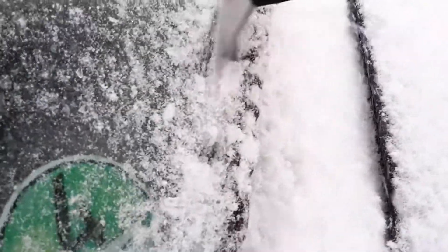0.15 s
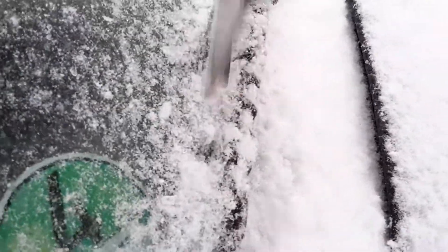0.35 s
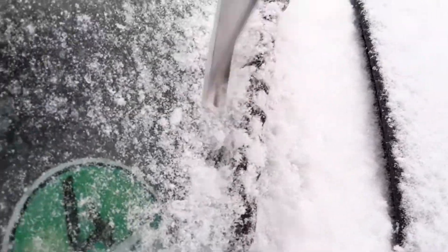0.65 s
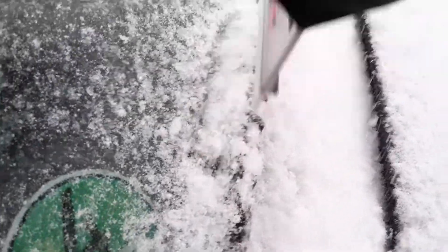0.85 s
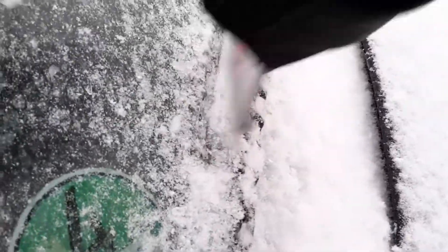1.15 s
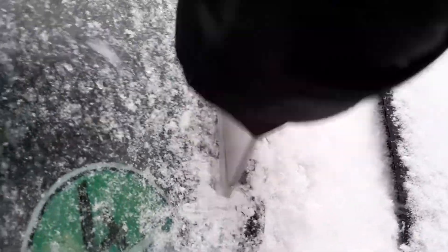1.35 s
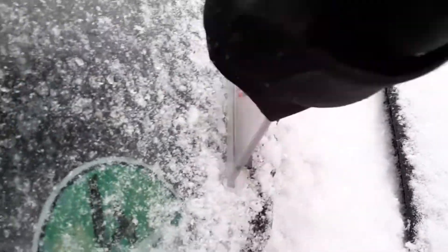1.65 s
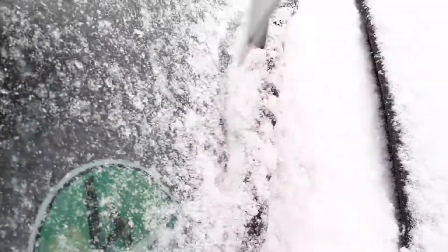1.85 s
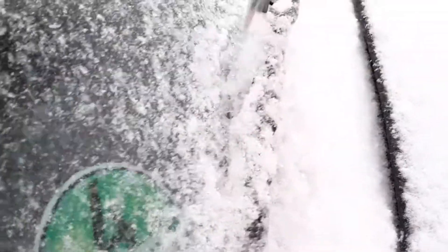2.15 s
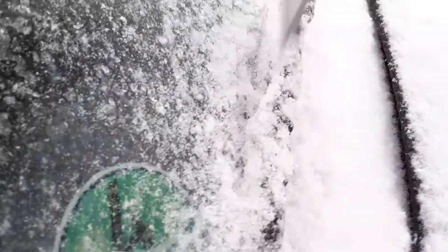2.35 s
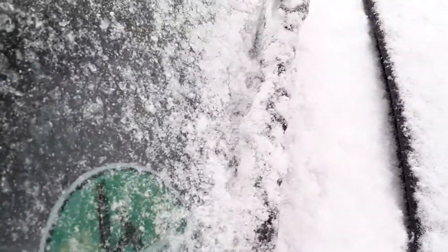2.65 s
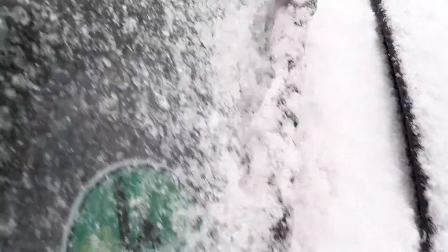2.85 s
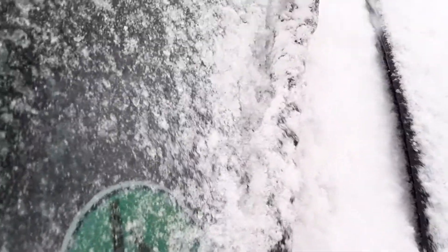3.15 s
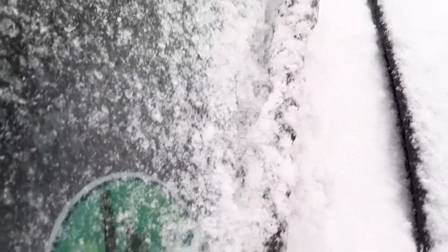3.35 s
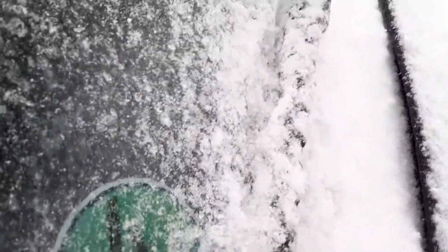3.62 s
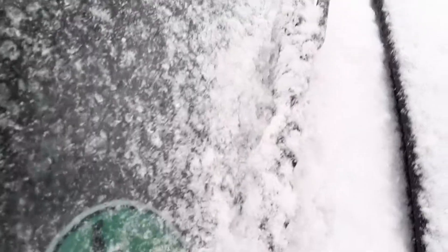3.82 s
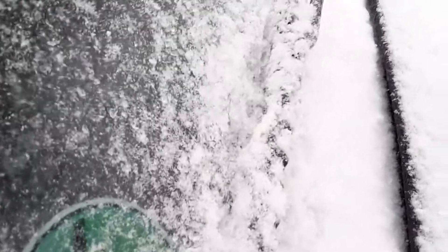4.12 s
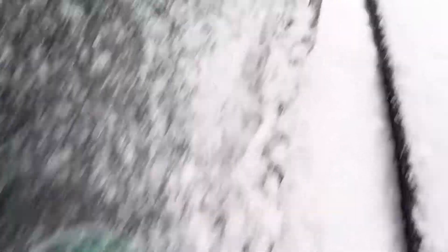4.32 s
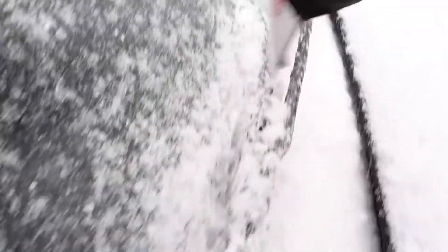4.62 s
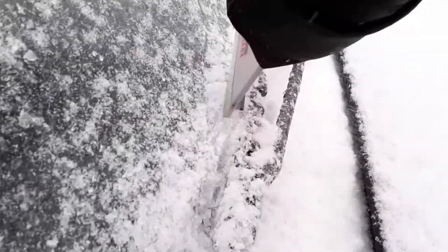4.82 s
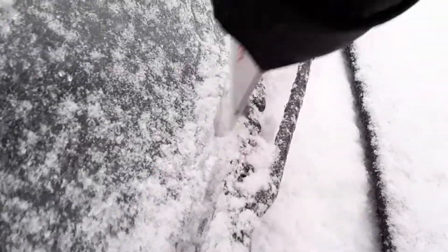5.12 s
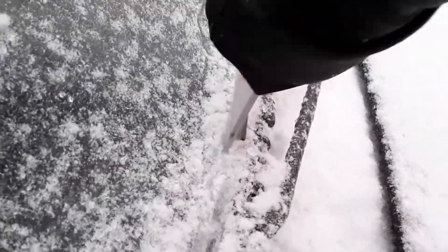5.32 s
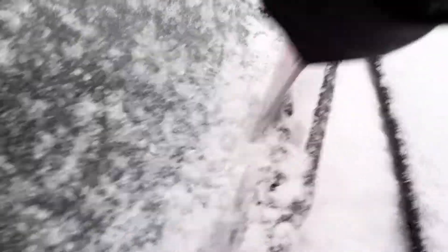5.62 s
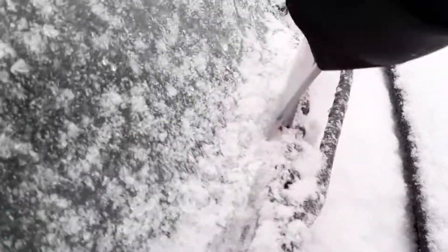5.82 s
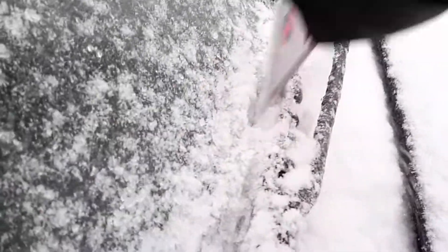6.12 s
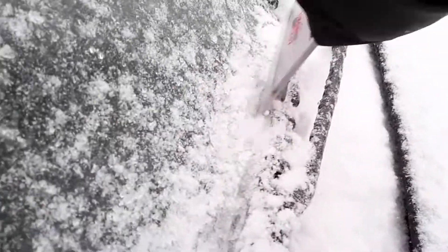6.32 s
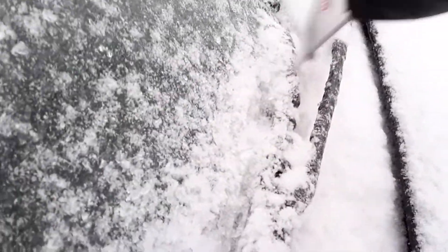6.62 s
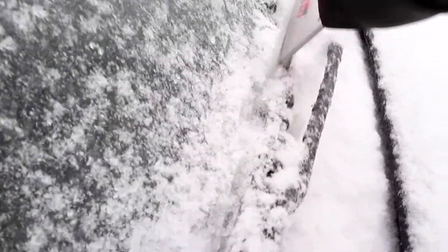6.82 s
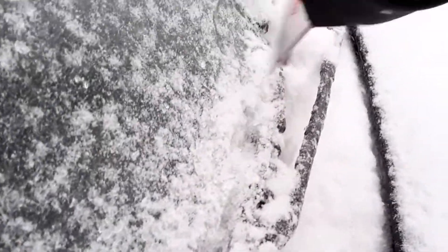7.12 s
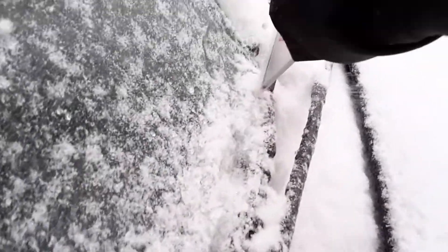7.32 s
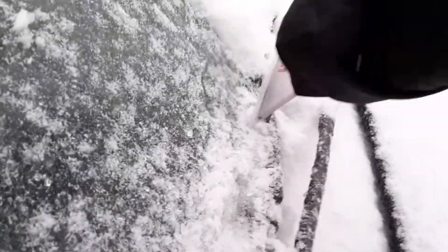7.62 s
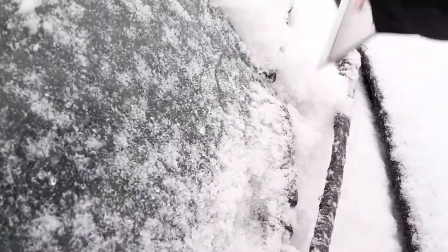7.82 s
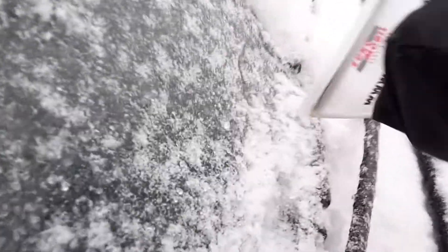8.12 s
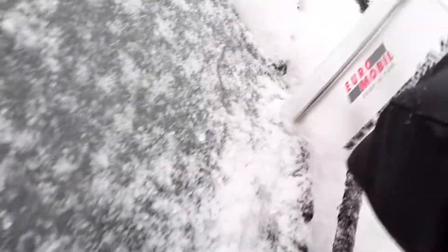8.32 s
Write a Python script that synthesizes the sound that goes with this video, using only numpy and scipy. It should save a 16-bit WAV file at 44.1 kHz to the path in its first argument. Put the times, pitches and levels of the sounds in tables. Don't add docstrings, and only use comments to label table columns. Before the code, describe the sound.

Close outdoor stereo pickup of a plastic scraper working on a snowy car windscreen. Strokes land roughly every 0.3 seconds, each a dull hollow glass boom with a brittle crackle and plastic clack, then a light fizz as the blade pulls back. Blows are hardest around the middle, where a distant car faintly swells. It ends with a weak tap and soft slide through loose snow.

```python
import sys
import numpy as np
from scipy import signal
from scipy.fft import rfft, irfft
from scipy.io import wavfile
from scipy.ndimage import uniform_filter1d

SR = 44100
rng = np.random.default_rng(int(sys.argv[2]) if len(sys.argv) > 2 else 0)


def gain_from_decibels(decibels):
    exponent = np.asarray(decibels, float) / 20
    return 10 ** exponent


def output_pcm(signal):
    pcm = np.clip(np.atleast_2d(signal).T, -1, 1) * 32767
    wavfile.write(sys.argv[1], SR, np.round(pcm).astype(np.int16))


N = 373527


def evened(x):
    return x / np.sqrt(np.mean(x ** 2) + 1e-20)


def add(mix, at, sound):
    part = mix[at:][:len(sound)]
    part += sound[:len(part)]


def curve(rows, column):
    return np.interp(np.arange(N) / SR, [row[0] for row in rows], [row[column] for row in rows])


def colour(x, points):
    hz, db = np.transpose(points)
    log_hz = np.log(np.fft.rfftfreq(4096, 1 / SR) + 1)
    log_gain = np.interp(log_hz, np.log(hz), db, -90, -90) * np.log(10) / 20
    circle = np.concatenate([log_gain, log_gain[-2:0:-1]])
    phase = signal.hilbert(circle).imag
    taps = np.fft.ifft(np.exp(circle - 1j * phase)).real[:2048]
    return signal.oaconvolve(x, taps[None] / np.linalg.norm(taps), axes=1)[:, :N]


def ring(modes, lift_db=0, size=SR // 3):
    hz, db, t60, rise = np.transpose(modes)[:, :, None]
    t = np.arange(size) / SR
    fade = gain_from_decibels(db + lift_db - 60 * t / t60)
    swell = 1 - np.exp(-t / rise)
    return (fade * swell * np.sin(2 * np.pi * hz * t)).sum(0)


def pair(same):
    a, b = rng.standard_normal((2, N))
    same = np.clip(same, 0, 1)
    return np.array([a, same * a + np.sqrt(1 - same ** 2) * b])


def scatter(x, level_db, t60, top_hz):
    t = np.arange(SR // 3) / SR
    tail = rng.standard_normal((2, len(t))) + rng.standard_normal(len(t))
    tail = signal.lfilter(*signal.butter(2, top_hz, fs=SR), tail) * gain_from_decibels(-t / t60 * 60)
    return x + gain_from_decibels(level_db) * signal.oaconvolve(x, tail / np.linalg.norm(tail[0]), axes=1)[:, :N]


# t/s, rumble level/dB, tyre hiss level/dB
ROAD = [
    (0.0, -64, -87),
    (2.44, -66.5, -88.5),
    (4.28, -51.5, -70),
    (6.21, -64, -86),
    (7.35, -61.5, -88),
    (8.0, -66.5, -91),
]
# f/Hz, level/dB
RUMBLE = [(20, -25.5), (40, -4.5), (90, 1.5), (220, -4), (400, -15.5), (600, -21), (900, -35), (1600, -58)]
# f/Hz, level/dB
TYRES = [(700, -3.5), (1100, -3), (1700, -4.5), (2400, -1), (3300, -15.5), (5000, -21), (8800, -38),
         (10100, -7.5), (11200, -10), (13500, -8.5), (14500, -4.5), (14800, -45)]


def road():
    lumps = gain_from_decibels(2.0 * evened(uniform_filter1d(rng.standard_normal(N), 2500)))
    rumble = colour(pair(0.77), RUMBLE) * lumps * gain_from_decibels(curve(ROAD, 1) + 4.5)
    hiss = colour(pair(0.078), TYRES) * gain_from_decibels(curve(ROAD, 2) + 2.5)
    return rumble + hiss


# t/s, level/dB
LAST_SLIDE = [
    (8.03, -99),
    (8.2, -82),
    (8.3, -76),
    (8.47, -66),
]
# middle t/s, length t/s, fizz level/dB, level/dB of snow trickling after the stroke
RETURNS = [(0.279, 0.059, -62.5, -63.5), (0.602, 0.041, -60.5, -63.5), (0.919, 0.034, -52, -64),
           (1.242, 0.15, -66, -60), (1.542, 0.048, -59, -65), (1.849, 0.048, -65, -73),
           (2.144, 0.06, -57, -66.5), (2.419, 0.053, -52, -63), (2.699, 0.13, -57.5, -66),
           (2.974, 0.049, -54, -60.5), (3.256, 0.037, -51, -65.5), (3.527, 0.052, -78, -63),
           (3.853, 0.3, -75, -61.5), (4.143, 0.045, -50, -58), (4.427, 0.019, -50, -54.5),
           (4.696, 0.04, -52, -59), (4.989, 0.052, -49, -60.5), (5.241, 0.029, -47.5, -61.5),
           (5.512, 0.036, -74, -62), (5.76, 0.03, -66, -63.5), (6.01, 0.025, -58.5, -78),
           (6.246, 0.071, -53.5, -69), (6.487, 0.2, -68, -60), (6.733, 0.11, -76, -84.5),
           (6.972, 0.036, -72.5, -74), (7.228, 0.072, -83, -70), (7.504, 0.016, -63, -71),
           (7.794, 0.039, -60.5, -73)]


def drag():
    t = np.arange(N) / SR
    fizz = gain_from_decibels(curve(LAST_SLIDE, 1)) * (t > LAST_SLIDE[0][0])
    rasp = np.zeros(N)
    part = t[:round(0.45 * SR)]
    for middle, length, fizz_db, trickle_db in RETURNS:
        at = round((middle - 0.1) * SR)
        pull = gain_from_decibels(fizz_db - 68 * ((part - 0.1) / length) ** 2)
        add(fizz, at, gain_from_decibels(trickle_db + 3.0 - 90 * part))
        add(fizz, at, pull)
        add(rasp, at, pull * gain_from_decibels(-26.5 - (1 - 0.69) * fizz_db))
    for blow in BLOWS:
        at = round(blow[0] * SR) - 900
        fading = fizz[at:][:900].copy()
        add(fizz, at, -0.8 * fading * np.minimum(np.arange(900) / 300, 1))
    hits = rng.random(N) < 3000 / SR
    size = gain_from_decibels(3.5 * np.minimum(rng.exponential(1, N), 4)) * hits
    flutter = gain_from_decibels(1.4 * evened(uniform_filter1d(rng.standard_normal(N), 200)))
    grains = evened(size * pair(0.3) + 0.5 * pair(0.091)) * flutter * gain_from_decibels([[1.2], [-1.2]])
    dull = signal.butter(2, 2970, fs=SR)
    rasping = signal.lfilter(*dull, colour(grains * rasp, CLACK))
    return gain_from_decibels(-4.0) * colour(grains * fizz, PORT) + gain_from_decibels(-3.0) * rasping


def stroke(s):
    return np.argmin([abs(blow[0] - s) for blow in BLOWS])


# crackle level/dB below the whistle, treble lag of the left port [samples],
# treble left-right level/dB, low mode level/dB, middle mode level/dB
SPOTS = [(4.5, -20.5, 6.5, -0.5, 9), (6, -4, 3.5, 8, -5.5), (5, -19.5, 3, 3, -5.5), (4, -2, 5, 1, -3),
         (2, -3, 3.5, 8.5, -1), (7, -3.5, 5, 5.5, 7.5), (1.5, -17.5, 2, -4, 0.5),
         (-1.5, -8, -1, -0.5, 14.5), (3, 16.375, 6.5, 0, -2.5), (8, -1, 0, 5, 4), (2, -17.5, 3, 1, -8),
         (8.5, -4, 2.5, 6, 3), (4.5, -11.5, 4, -7.5, -11), (3, 5.5, 4, -4, 2.5), (8.5, -19, 6.5, 8, 4.5),
         (10.5, 3.5, 4, 4, 10), (0, -8.5, 1.5, 2.5, -8), (-5.5, -4, 2, 4.5, -1.5), (5, 6, 4.5, 8, -0.5),
         (-1.5, -9, 3, 7.5, -2), (-5, 0.5, -3, 4.5, 0.5), (2, -4.5, 7, 0.5, 4), (0, 0, 2, 7.5, -8),
         (-12, -5.5, 3, 6.5, -15), (4.5, -14, 3.5, -1, -2), (-0.5, 4.5, 2.5, 9, 9.5),
         (-5, -0.5, 3.5, 0.5, 1.5), (-9, -12, 3.5, 1, 0.5), (-14, 28.75, 10, 2, 0)]


def spot(s):
    return SPOTS[stroke(s)]


# t/s, length t/s, crackle level/dB, blade clack relative level/dB
BITES = [(0.152, 0.011, -29.5, -18), (0.485, 0.023, -34.5, -21), (0.795, 0.011, -39, -8),
         (1.127, 0.013, -34, -16.5), (1.4395, 0.013, -37, -11.5), (1.7366, 0.0024, -34.5, -8),
         (2.038, 0.0035, -26, -16.5), (2.319, 0.0071, -30.5, -17.5), (2.6035, 0.011, -22, -22.5),
         (2.8737, 0.005, -26.5, -9.5), (3.1493, 0.0039, -27.5, -5.5), (3.435, 0.0031, -30.5, 4.5),
         (3.715, 0.011, -23, -8), (4.017, 0.0016, -17.5, -3), (4.3205, 0.0054, -24.5, -7.5),
         (4.584, 0.0032, -21, -10), (4.87, 0.0051, -21.5, -16.5), (5.1269, 0.0018, -23, -5.5),
         (5.4107, 0.0034, -40.5, 3), (5.644, 0.014, -31.5, -15), (5.8942, 0.0013, -24.5, -6.5),
         (6.132, 0.0057, -33, -17), (6.3921, 0.0027, -27, -11.5), (6.649, 0.0012, -27, -6),
         (6.894, 0.0036, -32, -8), (7.1435, 0.0014, -27.5, -5.5), (7.402, 0.0054, -33.5, -10),
         (7.6944, 0.0024, -31, -6.5), (8.216, 0.0063, -59.5, -2.5)]
# t/s, length t/s, crackle level/dB
CRACKS = [(0.155, 0.0013, -28), (0.16, 0.0018, -26.5), (0.1627, 0.001, -33), (0.4846, 0.0031, -33.5),
          (0.4968, 0.0014, -25.5), (0.4988, 0.002, -38), (0.7975, 0.0023, -30), (0.804, 0.0027, -27),
          (1.1261, 0.0023, -29), (1.1315, 0.0046, -24.5), (1.4464, 0.0022, -29), (1.7376, 0.0048, -37.5),
          (1.744, 0.0043, -37), (2.037, 0.0034, -28), (2.045, 0.0022, -30.5), (2.3214, 0.0032, -19),
          (2.328, 0.004, -21), (2.614, 0.0028, -31), (2.6184, 0.0024, -27), (2.873, 0.0022, -34),
          (2.8746, 0.0037, -34), (2.885, 0.0027, -40), (2.889, 0.0033, -47), (3.1488, 0.002, -24),
          (3.152, 0.0018, -28), (3.4366, 0.0017, -29), (3.4407, 0.0038, -35.8), (3.718, 0.0017, -18),
          (3.7266, 0.0034, -30.0), (4.017, 0.0029, -29), (4.0224, 0.0022, -17), (4.318, 0.0075, -28.2),
          (4.5827, 0.0035, -27), (4.5895, 0.0024, -23.5), (4.5918, 0.0015, -24), (4.851, 0.0028, -22),
          (5.126, 0.0015, -26.5), (5.4084, 0.0014, -42), (5.4108, 0.0012, -30.5), (5.6468, 0.0027, -29.5),
          (5.6537, 0.0013, -27.5), (5.6566, 0.002, -25.5), (5.6578, 0.0018, -29), (5.661, 0.0012, -25),
          (5.8916, 0.0032, -29.5), (5.8995, 0.00089, -27), (6.1343, 0.0022, -31), (6.1405, 0.0021, -30.4),
          (6.3914, 0.0013, -25.5), (6.3985, 0.002, -26.5), (6.6484, 0.0014, -31.5), (6.654, 0.0012, -26),
          (6.8916, 0.0026, -36), (6.899, 0.0035, -33.5), (7.1423, 0.0029, -29), (7.4035, 0.0018, -27),
          (7.4057, 0.0023, -35.5), (7.6946, 0.0034, -30), (8.217, 0.00083, -50.5), (8.221, 0.0015, -60)]
# t/s, crackle level/dB, relative level/dB of the knock in the glass, relative level/dB of the blade clack
SNAPS = [(0.1591, -29, -4, -15.5), (0.4987, -33.5, -6, -10.5), (0.8049, -33, -2, -20),
         (1.1399, -21, -17, -22.5), (1.4453, -37, -1, -2), (1.457, -41, -13, -3.5), (2.0485, -35, 3.5, -13),
         (2.3299, -23.5, -14.5, -12), (2.3356, -19.5, -18.5, -16.5), (2.598, -29, -16.5, -17),
         (2.618, -29.5, 1, -4), (2.8836, -24, -17, -12.5), (3.152, -24.5, -6.5, -8.5),
         (3.4424, -29.5, -1, -18), (3.723, -23.5, 0.5, -15), (4.0219, -23.5, 0.5, -16.5),
         (4.5911, -19.5, -6.5, -13), (4.8587, -23.5, -33.5, -11), (5.1178, -25.5, -14, -17.5),
         (5.645, -32.5, -15, -20), (5.662, -36, -13.5, 0.5), (5.6674, -24.5, -7.5, -21),
         (5.8997, -33, -6, -14.5), (6.1417, -38.5, -7, -9), (6.146, -28.5, -4.5, -13),
         (6.3993, -25, -16.5, -12), (6.654, -31.5, -21.5, -7), (6.659, -31, -6, -13),
         (4.8621, -30.5, -1, -8), (6.1403, -37.5, 2, -1), (3.7256, -33, 2, -20), (6.898, -30, -3.5, -11),
         (7.147, -43.5, 12.5, -9)]
# (t/s, level/dB, level/dB, level/dB)
TICKS = [(0.2087, -44.5, -12, -24), (0.2854, -46, -0.5, -16), (8.457, -57.5, 2, -20),
         (0.9164, -40, -12.5, -22), (0.936, -37, -19.5, -19.5), (1.2333, -41, -12, -35),
         (1.2698, -40.5, -7.5, -28), (1.485, -37.5, 3.5, -8.5), (1.7613, -30.5, -8, -5.5),
         (4.79, -54, 8.5, 5.5), (5.04, -52.5, 6, 3), (1.5506, -49.5, -1.5, -6.5), (2.1459, -43.5, -11, -6),
         (2.3893, -41, -6.5, -6), (2.687, -48.5, 0, -21), (2.9314, -39, -11, -17), (2.9728, -44, -5, -35),
         (3.2481, -41.5, -8, -22.5), (3.5372, -44.5, -4.5, 3.5), (3.8214, -30.5, -14.5, -6),
         (4.8795, -40, 5, -6.5), (4.9824, -42.5, 0, -4), (5.2545, -47.5, 1.5, 4.5), (5.5405, -48.5, -1, -5),
         (6.2314, -46.5, -6, -2), (6.4538, -45.5, -4, -5), (6.4788, -42.5, -19, -12.5),
         (7.229, -56.5, 0.5, 9), (7.4358, -41, -10, -13), (7.5167, -48, -8, -6), (8.3112, -49.5, -6.5, -25)]
# t/s, crackle level/dB
CRYSTALS = [(0.2976, -52), (0.58, -54), (0.841, -52), (0.945, -47), (1.2448, -44), (1.263, -40),
            (1.502, -51), (2.031, -32.5), (2.12, -53), (2.1647, -54), (2.451, -51), (0.402, -52),
            (8.276, -58), (3.847, -47), (3.897, -49.5), (4.116, -47), (5.741, -52), (6.266, -52.5),
            (6.518, -56), (6.5508, -58), (2.316, -32), (2.623, -29), (2.596, -44), (2.604, -32)]
SNAP_S, TICK_S, CRYSTAL_S = 0.0039, 0.0013, 0.0024
BED_DB = -8.5


def breaks():
    rows = [(s, length, db + BED_DB, db + 3, clack_db - BED_DB) for s, length, db, clack_db in BITES]
    rows += [(s, length, db, db - 7, -23) for s, length, db in CRACKS]
    for table, length, bed_db in [(SNAPS, SNAP_S, BED_DB), (TICKS, TICK_S, 0)]:
        for s, db, knock_db, clack_db in table:
            shove_db = db + knock_db + 10 * np.log10(length * SR)
            rows.append((s, length, db + bed_db, shove_db, clack_db - bed_db))
    return rows + [(s, CRYSTAL_S, db, db - 9.5, -18) for s, db in CRYSTALS]


def white(x, size):
    z = rfft(x, 768)
    return z * np.linalg.norm(x) / np.sqrt(uniform_filter1d(abs(z) ** 2, size) + 1e-20)


def delayed(z, samples):
    return irfft(z * np.exp(-2j * np.pi * np.fft.rfftfreq(768) * samples))


# f/Hz, level/dB
PORT = [(6000, -52), (8300, -38), (9500, -29), (10200, -21), (11300, -26), (13000, -7), (14200, 0),
        (14600, -3), (14800, -32), (15900, -52)]
# f/Hz, level/dB
CLACK = [(600, -12.5), (1100, -1.5), (2000, -4), (3000, -17.5), (4000, -17), (5500, -26), (7000, -39)]
# f/Hz, level/dB, t60 t/s, rise t/s
BLADE = [(4413, 2, 0.017, 0.00011), (5680, -5.5, 0.043, 0.0017), (6270, 3, 0.013, 0.000073),
         (8860, -2.5, 0.062, 0.00015)]
# t/s, ring level/dB
GRIP = [(0.0, 1), (1.13, 8.5), (1.45, -1.5), (1.76, 7), (2.05, 1.5), (2.3, 3.5), (2.65, 7.5), (3.0, -13),
        (4.1, -12.5), (5.15, -3.5), (5.9, -4), (7.7, -8.5)]


def crust():
    crackle, clack, knock = np.zeros((3, 2, N))
    t, hz = np.arange(700) / SR, np.fft.rfftfreq(768, 1 / SR)
    kick = -np.hanning(14)
    rows = breaks()
    draws = rng.standard_normal((len(rows), 5, len(t)))
    for (s, length, db, shove_db, clack_db), (a, b, c, size, place) in zip(rows, draws):
        shape = np.minimum(t / 0.00064, 1) * gain_from_decibels(-5 * t / length - np.maximum(t - length, 0) / 0.00019)
        grain = shape * gain_from_decibels(0.49 * evened(uniform_filter1d(size, 25)))
        grain *= np.linalg.norm(shape) / np.linalg.norm(grain)
        tilt_db, lag, pan_db, *_ = spot(s)
        twang_db = KNOCKS[stroke(s)][0]
        direct = white(grain * a, size=21) * gain_from_decibels(tilt_db * ((hz < 13300) - 0.56))
        in_blade = white(grain * c, size=11) * gain_from_decibels(twang_db * np.exp(-((hz - 1900) / 450) ** 2))
        unlike = white(grain * b, size=21)
        late = np.clip(-lag, -8, 24)
        at = round(s * SR) - 20
        for side, sign in enumerate([1, -1]):
            gain = gain_from_decibels(db + sign * (pan_db / 2 + 0.16 * place[1]))
            clack_gain = gain * gain_from_decibels(clack_db + sign * 2.9)
            wait = 8 + side * late
            add(crackle[side], at, delayed(gain * (direct + 0.17 * sign * unlike), wait))
            add(clack[side], at, delayed(clack_gain * (in_blade + 0.045 * sign * unlike), wait))
            add(knock[side], at + 8 + 7 * side, gain_from_decibels(shove_db + sign * 2.2) * kick)
    grip = gain_from_decibels(curve(GRIP, 1))
    knocked = gain_from_decibels(-34.5) * signal.oaconvolve(knock, ring(KNOCK)[None], axes=1)[:, :N]
    pinged = gain_from_decibels(-39.5) * signal.oaconvolve(clack * grip, ring(BLADE)[None], axes=1)[:, :N]
    crackle = scatter(crackle, -41.0, t60=0.07, top_hz=15000)
    clack = colour(scatter(clack, -10.0, t60=0.038, top_hz=3200), CLACK)
    treble = signal.filtfilt(*signal.butter(2, 3020, "high", fs=SR), clack)
    clack = clack + (grip - 1) * treble
    return gain_from_decibels(3.5) * colour(crackle, PORT) + gain_from_decibels(-3.0) * clack + knocked + pinged


def jolts():
    rows = []
    for s, db, knock_db, _ in SNAPS:
        _, _, boom_db, upper_db = BLOWS[stroke(s)]
        shove_db = db + knock_db + 10 * np.log10(SNAP_S * SR)
        rows.append((s - 0.001, shove_db - 17.5, boom_db, upper_db))
    return rows


# t/s, force level/dB, boom mode level/dB, upper mode level/dB
BLOWS = [(0.1522, -22.5, -3, -1.5), (0.4868, -27.5, -6, 5.5), (0.7929, -23, -1, 9),
         (1.1249, -23.5, -0.5, 10), (1.4398, -26.5, -3, 6), (1.7356, -30.5, -2.5, 5),
         (2.04, -21.5, -21.5, 2.5), (2.3298, -23.5, 1, -12), (2.609, -22, -11, 8), (2.873, -22.5, -3, 7),
         (3.148, -17, -13, -7), (3.434, -21, 0, 7.5), (3.7153, -10.5, -7.5, 7.5), (4.016, -17, 11, 15),
         (4.324, -10, -9, 3), (4.5837, -47, 8.5, 2), (4.8669, -16.5, 0, 6.5), (5.126, -15, -4, 8.5),
         (5.41, -17.5, -6, 8), (5.6513, -18.5, -2, 4), (5.8919, -24.5, 1.5, 17), (6.132, -25.5, 6.5, 10),
         (6.391, -20.5, -3.5, 6.5), (6.654, -22.5, 5.5, 6), (6.891, -16.5, -3.5, -0.5),
         (7.1415, -16, -4.5, -10.5), (7.4012, -24.5, 3, 0), (7.6948, -20, -22, -4),
         (8.2206, -36, -4.5, -0.5)]
# (t/s, level/dB, level/dB, level/dB)
BUMPS = [
    (7.012, -53.5, 23, -14.5),
    (7.042, -53.5, 12, -8.5),
    (8.415, -46.5, 9.5, 7.5),
]
# f/Hz, level/dB, t60 t/s, rise t/s
GLASS = [(45.5, -1, 0.12, 0.02), (124.9, 6, 0.19, 0.0054), (175.5, 5, 0.099, 0.0048),
         (213.5, 5, 0.18, 0.0021), (272.5, 5.5, 0.055, 0.0094), (336.6, -2, 0.087, 0.0096)]
# t/s, delay t/s, level/dB
FRAME = [
    (0, 0.022, 2),
    (1.8, 0.022, -0.5),
    (2.0, 0.017, 0.5),
    (5.5, 0.017, -2.5),
    (5.6, 0.02253, -4),
    (8.4, 0.02, 1),
]
# t/s, pitch change [%]
LOAD = [
    (0.5, -1.5),
    (2.6, -0.73),
    (3.8, 1.1),
    (5.3, -0.5),
    (7.3, 1.36),
]
# offset level/dB, share of boom, share of upper
LOW_MIX, MIDDLE_MIX = (-3.5, 0.94, 0.061), (-1.2, 0.069, 0.74)


def glass():
    out = np.zeros((2, N))
    frame_s, frame_db, load = curve(FRAME, 1), curve(FRAME, 2), curve(LOAD, 1)
    push = np.diff(np.hanning(round(0.0023 * SR)), prepend=0)
    push = push / abs(push).sum()
    slap = 1 + 0.79 * np.exp(-np.arange(SR // 3) / SR / 0.0076)
    for s, force_db, boom_db, upper_db in BLOWS + BUMPS + jolts():
        at = round(s * SR)
        low_db, middle_db = np.dot([LOW_MIX, MIDDLE_MIX], [1, boom_db, upper_db]) + spot(s)[3:]
        lift_db = np.array([0, boom_db, low_db, 0, middle_db, upper_db])[:, None]
        modes = GLASS * np.array([1 + load[at] / 100, 1, 1, 1])
        boom = -signal.fftconvolve(slap * ring(modes, lift_db), push)
        dulled = uniform_filter1d(boom, round(0.0014 * SR))
        add(boom, round(frame_s[at] * SR), gain_from_decibels(frame_db[at]) * dulled)
        for side, late in enumerate([0, 7]):
            add(out[side], at + late, gain_from_decibels(force_db - 6.5) * boom)
    return out * gain_from_decibels([[0.7], [-0.7]])


# f/Hz, level/dB, t60 t/s, rise t/s
KNOCK = [(428.2, -3.5, 0.062, 0.00033), (515, 0, 0.03, 0.0016), (600.3, -2.5, 0.031, 0.00056),
         (736.6, -9, 0.052, 0.00088), (856.6, -14, 0.059, 0.0036), (1170, -20, 0.0093, 0.0005)]
# twang of the blade level/dB, peak level/dB, first mode level/dB,
# middle modes level/dB, top modes level/dB
KNOCKS = [(-1, -35, 9, 0, 4), (-4, -34.5, 0, -11.5, -4), (0.5, -19.5, -1, -23.5, 0),
          (-4.5, -23, -15, -3, 1.5), (-4, -29.5, -1, -4, 2), (1, -33, 0, -11, 7.5), (2, -31, 9.5, 2.5, -1),
          (-0.5, -36.5, 9, -9, 5), (-5, -31, 5, -3, -12), (-6, -23.5, -0.5, -2, 4.5),
          (-6.5, -24, -8, -0.5, 7.5), (-7, -19.5, 1.5, -11.5, -3.5), (-3.5, -24.5, 3, -16.5, 4),
          (-6.5, -16.5, -2, -1.5, 8), (-6, -15, -1, 2, 6), (-2.5, -27, -8.5, 6, 4.5),
          (-5, -20, -1, -8, -3.5), (-9, -19, 2.5, 6, 5), (0, -22, -4, 3.5, 6), (-2.5, -35, 9.5, 9, 5),
          (1.5, -21, 0.5, -1.5, -2.5), (-8.5, -46, -4, -14, 4), (-4, -33.5, -11, 4, 11.5),
          (-5.5, -29, -1.5, 1, 6.5), (-1, -32.5, -8, 5.5, -6), (-2, -29.5, -4, 1, -1),
          (1.5, -40, 7, -6.5, -7.5), (0.5, -36.5, 8, 6.5, 7.5), (0.5, -53, -6, -2, 3)]
# f/Hz, level/dB, t60 t/s, rise t/s
LINGER = [(780, -50.5, 0.29, 0.004)]
THUD_LAG_S, THUD_S = 0.0018, 0.0018


def knocks():
    out = np.zeros((2, N))
    thud = np.hanning(round(THUD_S * SR)) ** 2
    for (s, *_), (_, db, first_db, middle_db, top_db) in zip(BLOWS, KNOCKS):
        lift_db = np.array([first_db, middle_db, middle_db, top_db, top_db, top_db])[:, None]
        rung = signal.fftconvolve(ring(KNOCK, db - 20 + lift_db, size=5000), -np.hanning(14))
        add(rung, round(THUD_LAG_S * SR - THUD_S * SR / 2), gain_from_decibels(db - 1) * thud)
        for side, late in enumerate([0, 7]):
            add(out[side], round((s + 0.00074) * SR) + late, rung)
    for side in out:
        add(side, round(2.625 * SR), ring(LINGER))
    return out * gain_from_decibels([[1.8], [-1.8]])


def scene():
    pane = glass() + knocks() + crust()
    return scatter(pane, -31.5, t60=0.49, top_hz=700) + drag() + road()


def top_cut(x):
    return signal.sosfilt(signal.butter(12, 15940, fs=SR, output="sos"), x)


def record(dry):
    thinned = signal.lfilter(*signal.butter(2, 28, "high", fs=SR), dry)
    hiss = signal.lfilter(*signal.butter(4, [3500, 12200], "band", fs=SR), pair(0))
    return top_cut(thinned + gain_from_decibels(-90.5) * hiss)


dry = scene()
out = record(dry)
output_pcm(out)
```